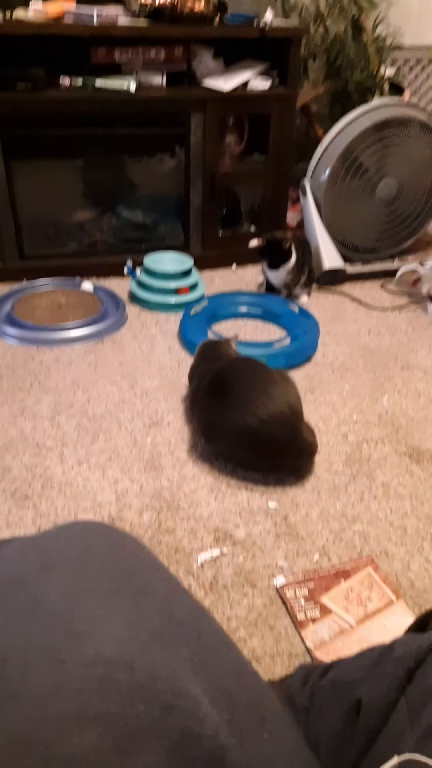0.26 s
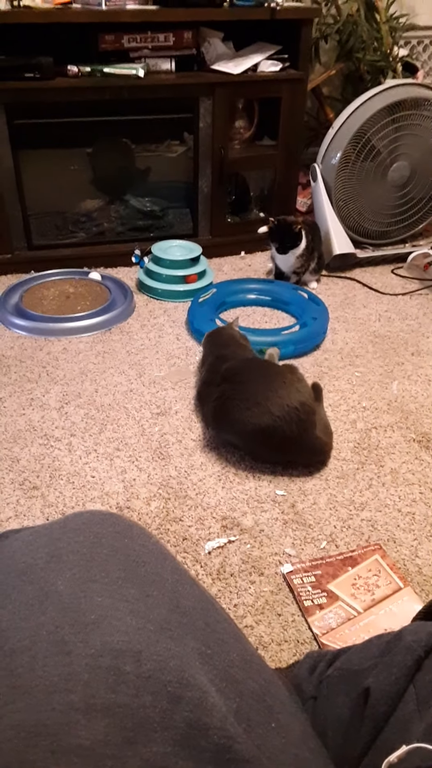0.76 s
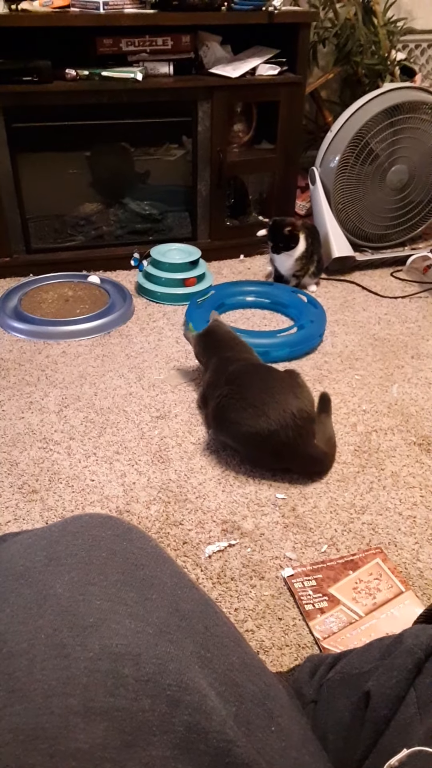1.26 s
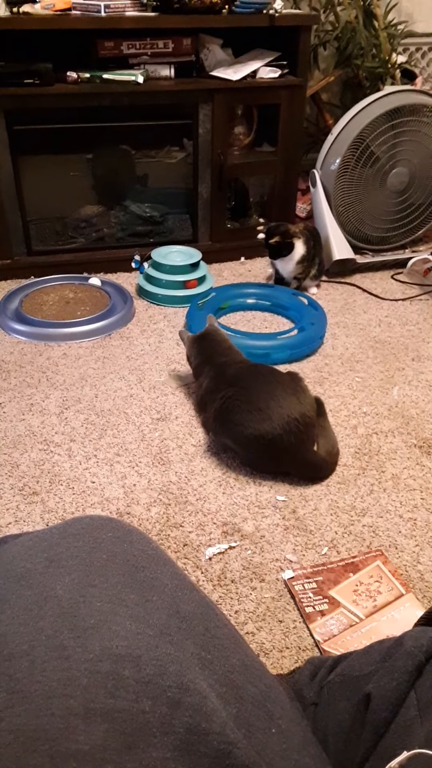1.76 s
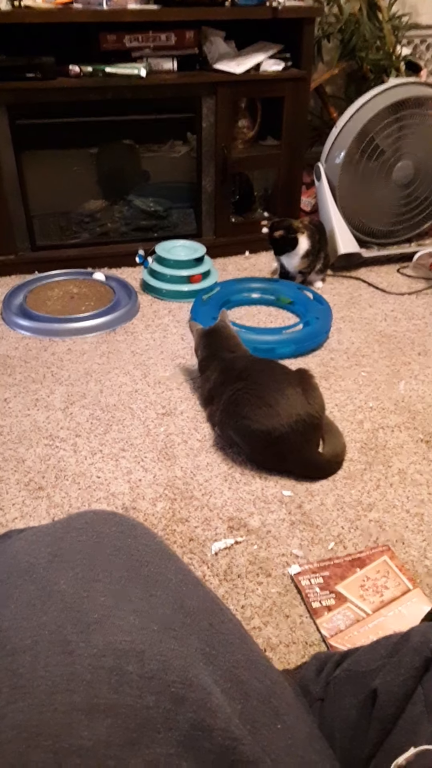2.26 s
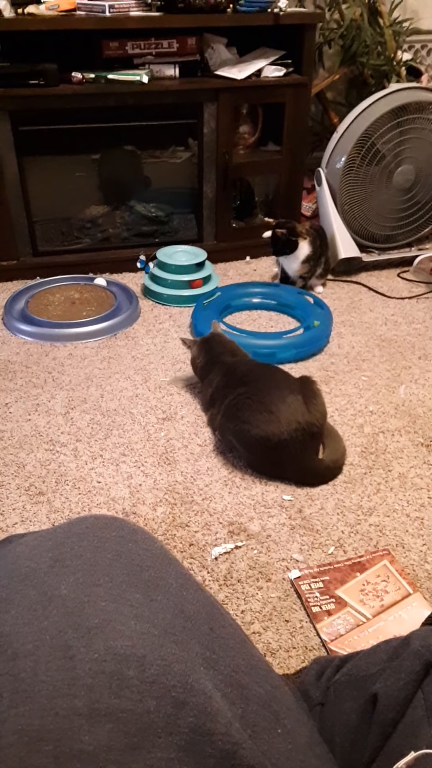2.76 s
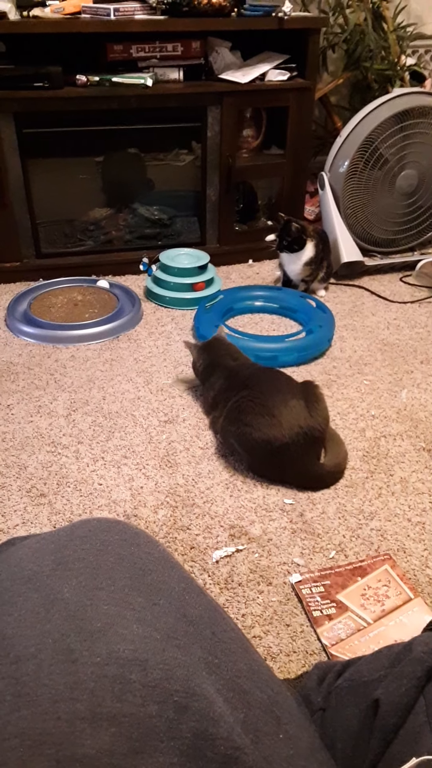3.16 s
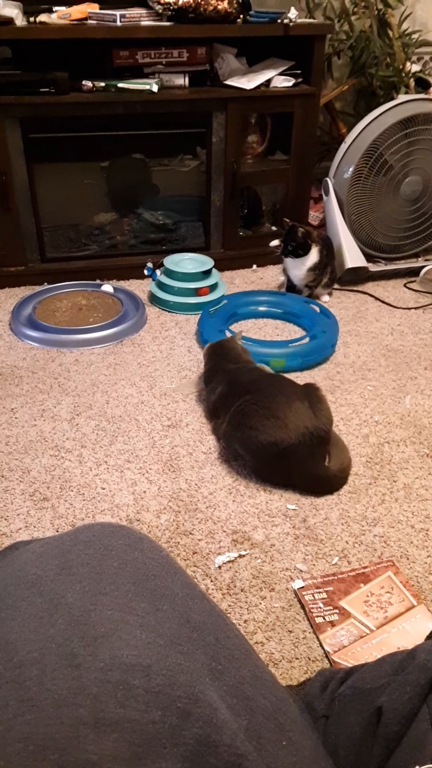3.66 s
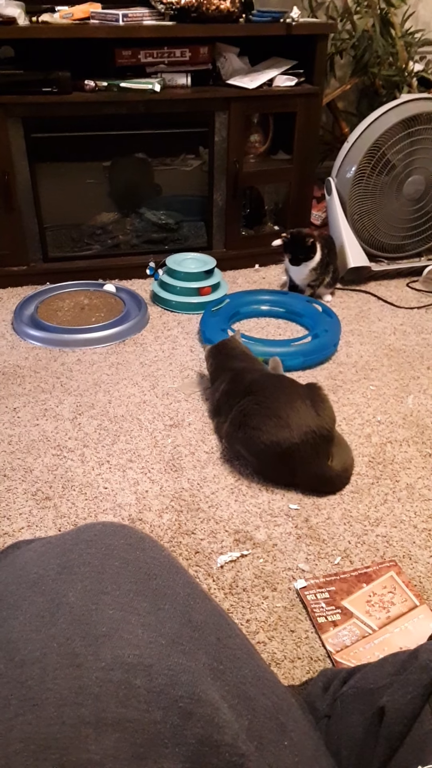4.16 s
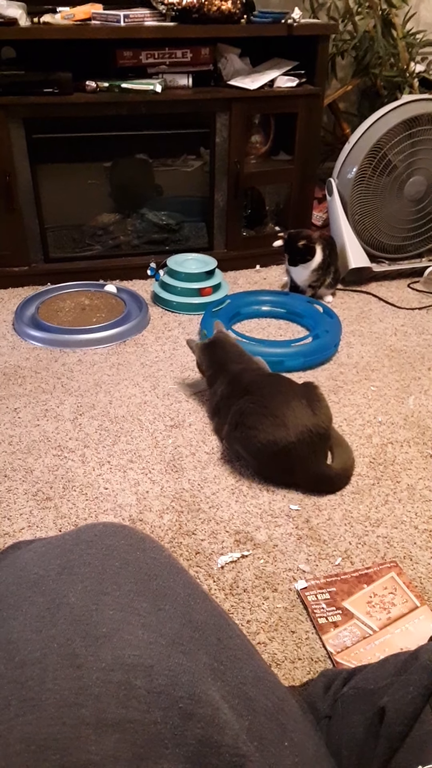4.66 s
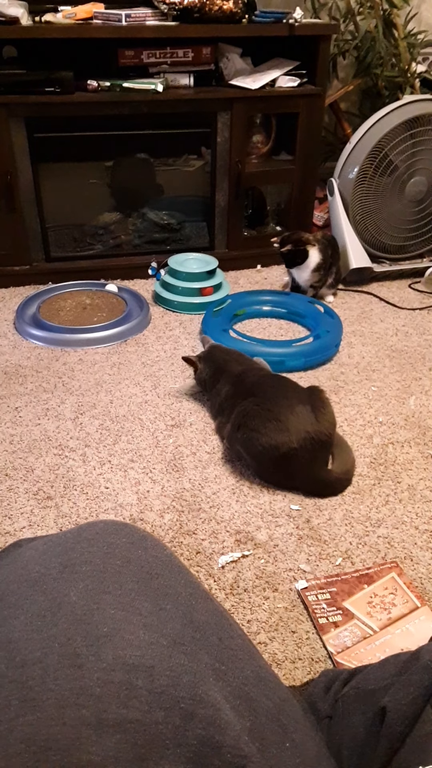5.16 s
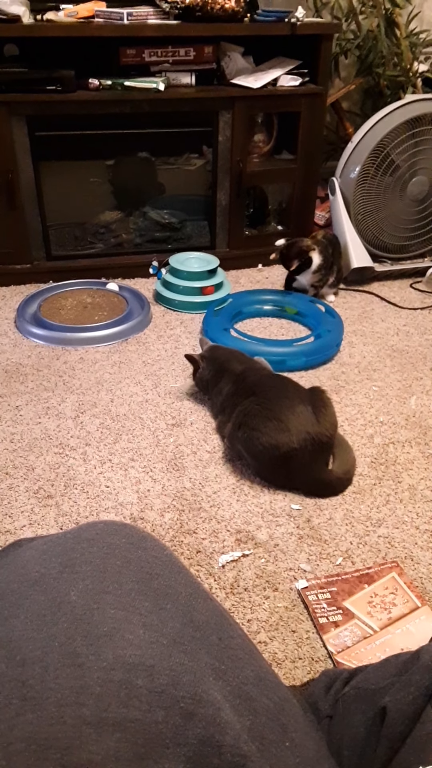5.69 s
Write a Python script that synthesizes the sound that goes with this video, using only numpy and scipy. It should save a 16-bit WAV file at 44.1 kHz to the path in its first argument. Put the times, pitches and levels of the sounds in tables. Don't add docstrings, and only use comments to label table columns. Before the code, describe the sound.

A plastic ball scrapes, knocks and rolls round a hollow toy track in bursts as a cat paws it, over a faint low fan hum.

```python
import sys
import numpy as np
from scipy import signal
from scipy.fft import rfft, irfft, next_fast_len
from scipy.io import wavfile
from scipy.ndimage import map_coordinates

SR = 44100
rng = np.random.default_rng(int(sys.argv[2]) if len(sys.argv) > 2 else 0)


def ratio(d):
    e = np.asarray(d, float) / 20
    return 10 ** e


def store_pcm(level_fs):
    pcm = np.round(np.clip(level_fs, -1, 1) * 32767).astype(np.int16)
    wavfile.write(sys.argv[1], SR, np.atleast_2d(pcm).T)


N = 261513
SIZE = 2 ** 14
BINS = np.fft.rfftfreq(SIZE, 1 / SR)


def unit(x):
    return x / np.sqrt(np.mean(np.abs(x) ** 2) + 1e-20)


def along(points, hz):
    f, v = np.transpose(points)
    return np.interp(np.log(hz + 1), np.log(f + 1), v)


def wobble(rate):
    knots = rng.standard_normal(int(N * rate / SR) + 4)
    return map_coordinates(knots, [np.arange(N) * rate / SR])


def filtered(x, response):
    m = next_fast_len(N + SR // 2)
    return irfft(rfft(x, m) * response(np.fft.rfftfreq(m, 1 / SR)), m)[..., :N]


# f/Hz, level/dB rms
MOTOR_LINES = [(59.2, -60), (118.4, -61), (258.4, -70)]
# f/Hz, level/dB per Hz
RUMBLE = [(25, -46), (48, -13), (140, -5), (330, -17), (472, -21), (620, -32.5), (1500, -30), (4000, -120)]
# f/Hz, correlation/1
ALIKE = [(60, 0.89), (130, 1), (290, 0.91), (640, 0.063), (1410, -0.74), (3100, 0.21), (6820, -0.018),
         (15000, 0.56)]


def fan():
    t = np.arange(N) / SR
    lines = 0
    for (hz, db), unsteady_db in zip(MOTOR_LINES, [0.3, 2.5, 1.5]):
        level = ratio(db + 3 + unsteady_db * wobble(7.1))
        lines = lines + level * np.sin(2 * np.pi * hz * t + 0.14 * unsteady_db * wobble(3.4))

    def mid_side(hz):
        turn = np.arccos(np.clip(along(ALIKE, hz), -1, 1)) / 2
        return ratio(along(RUMBLE, hz)) * [np.cos(turn), np.sin(turn)]

    mid, side = filtered(rng.standard_normal((2, N)), mid_side)
    rumble = unit(np.array([mid + side, mid - side]))
    return lines + ratio(-58 + 0.57 * wobble(5.24)) * rumble


def peak(f, hz, width):
    return 1j * f * width / (hz * hz - f * f + 1j * f * width)


def plastic(modes, count):
    spot_db, spot_pitch = 1.5, 0.015
    spot = rng.standard_normal((count, len(modes), 2))
    rows = 0
    for k, (hz, width, db) in enumerate(modes):
        level = ratio(db + spot_db * spot[:, k, :1])
        rows = rows + (-1) ** k * level * peak(BINS, hz * (1 + spot_pitch * spot[:, k, 1:]), width)
    last = BINS / modes[-1][0]
    rows = rows / (1 + 1j * last - last ** 2)
    return rows / np.sqrt(np.mean(np.abs(rows) ** 2, axis=1, keepdims=True))


# t/s, level/dB
ECHOES = [(.004, -2), (.0062, -8), (.0115, -8), (.0155, -9), (.021, -11), (.03, -12)]
# f/Hz, t60/s
DECAY = [(300, 0.22), (800, 0.24), (2000, 0.2), (5500, 0.21), (14000, 0.031)]


def room(spectra, starts):
    lead_s = 0.00015
    shadow_hz = 6000
    wet_db = -4.5
    count = len(starts)
    hz, t, z = signal.stft(rng.standard_normal((count, 2, SIZE)), SR, nperseg=256)
    likeness = along(ALIKE, hz).clip(0, 1)[:, None]
    z[:, 1] += likeness * (z[:, 0] - z[:, 1])
    z = z * ratio(-60 * t / along(DECAY, hz)[:, None])
    tail = signal.istft(z, SR, nperseg=256)[1][..., :SIZE]
    tail *= 1 - np.exp(-np.arange(SIZE) / SR / 0.01)
    tail /= np.linalg.norm(tail, axis=2, keepdims=True)

    late = rng.standard_normal((count, len(ECHOES), 2, 1)) * 0.00008
    late = late + rng.standard_normal((count, len(ECHOES), 1, 1)) * 0.000313
    near = 0
    for k, (s, db) in enumerate(ECHOES):
        near = near + ratio(db) * np.exp(-2j * np.pi * BINS * (s + late[:, k]))
    direct = np.exp(-2j * np.pi * BINS * np.array([[0], [lead_s]]))
    early = direct * (1 / (1 + 1j * BINS / shadow_hz) + near)
    heard = irfft(spectra[:, None] * (early + ratio(wet_db) * rfft(tail)), SIZE)
    out = np.zeros((2, N + SIZE))
    for s, piece in zip(starts, heard):
        out[:, s:s + SIZE] += piece
    return out[:, :N]


# t/s, length/s, level/dB, swell over the length/dB, hardness/dB
SHOVES = [(0.531, .1, -71, -0.5, 3), (0.65, 0.016, -76.5, 13, 6.5), (0.763, 0.022, -66.5, 5, -3),
          (0.866, 0.11, -60, 7, -0.5), (0.979, 0.066, -49.5, -10.5, 0.5), (1.136, 0.15, -51, -15.5, 8),
          (1.224, 0.28, -49, -7, -8.5), (3.923, 0.056, -69, 10.5, -0.5), (4.048, .1, -83, 0, 9.5),
          (4.192, 0.1, -78, 6, 12), (4.295, 0.032, -51.5, 0, 0.5), (4.34, 0.027, -53.5, -14, 11),
          (4.377, 0.13, -52, -2, -8)]
# t/s, length/s, level/dB, swell/dB, hardness/dB
PASSES = [(1.545, 0.086, -52.5, -8, -6), (1.763, 0.16, -54.5, -1.5, -8), (2.018, 0.23, -53.5, -11, -6),
          (2.277, 0.14, -58, 2.5, -9.5), (2.568, 0.14, -50.5, -6, -16), (2.857, 0.15, -53.5, -8, -16),
          (3.121, 0.095, -53, 1.5, -13), (3.443, 0.04, -61.5, 0, -9.5), (3.782, 0.047, -66, 1, -15),
          (4.589, 0.056, -62.5, 19, -11), (4.915, 0.047, -58, 7.5, -12), (5.18, 0.062, -63, 11, -10.5),
          (5.516, 0.074, -53.5, -3, -15), (5.816, 0.061, -56, -0.5, -18)]
# t/s, level/dB, loss/dB per s
PUSHES = [
    (1.119, -55, 8),
    (4.295, -61.5, 6.5),
]


def contact(offset_db, slope, steep):
    rise_db_per_s, fall_db_per_s, murmur_hardness_db = 3986, 166, -14.5
    t = np.arange(0, N / SR, 0.002)
    s, length, db, swell_db, hard_db = np.transpose(SHOVES + PASSES)[..., None]
    shape_db = swell_db * np.clip((t - s) / length, 0, 1)
    shape_db -= rise_db_per_s * np.maximum(s - t, 0)
    shape_db -= steep * fall_db_per_s * np.maximum(t - s - length, 0)
    rubs = ratio(db + slope * hard_db + shape_db)
    push_s, push_db, loss_db = np.transpose(PUSHES)[..., None]
    murmur = (t > push_s) * ratio(push_db + slope * murmur_hardness_db - loss_db * (t - push_s))
    power = np.sum(rubs ** 2, axis=0) + np.sum(murmur ** 2, axis=0)
    return ratio(offset_db) * np.interp(np.arange(N) / SR, t, np.sqrt(power))


# f/Hz, width/Hz, level/dB
THUD = [(200, 42, -6), (348, 115, -2.5), (391, 48.6, 7.5), (454, 172, -6.5)]
# f/Hz, width/Hz, level/dB
WALL = [(679.5, 125, -6.5), (899, 182, -2.5), (1330, 310, -5), (1612, 191, -3.5), (1790, 118, 1),
        (2000, 338, -2.5)]
# f/Hz, width/Hz, level/dB
SHELL = [(3110, 770, 1), (3814, 680, -2.5), (4290, 670, -1), (5440, 4680, -6), (6260, 830, -2.5),
         (6580, 600, -4.5), (7670, 2700, -10)]
# f/Hz, width/Hz, level/dB
EDGE = [(9400, 13000, 6), (12000, 6000, 8), (14900, 1800, -6)]
# offset/dB, slope/dB per dB of hardness, steepness of the fall/1
FOLLOW = [(5.5, 0.98, 1.1), (1.5, 1.12, 1.2), (-2, 1.5, 0.85), (-16, 1.7, 1.8)]


def trundle():
    high, shell, crisp, edge = [contact(*part) for part in FOLLOW]
    step = SR // 10
    count = N // step + 1
    grit_db, ticks_per_s = 2.5, 1200
    size = ratio(grit_db * rng.exponential(size=N) + 0.75 * wobble(30)) * rng.choice([-1, 1], N)
    ticks = unit((rng.random(N) < ticks_per_s / SR) * size)

    def cut(gain):
        return rfft(np.resize(ticks * gain, (count, step)), SIZE)

    low = cut(ratio(-9.5) * contact(0, 0, 0.96))
    spectra = low * (plastic(WALL[:4], count) + ratio(-3) * plastic(THUD, count))
    spectra += cut(ratio(-8) * high) * plastic(WALL[4:], count)
    spectra += cut(ratio(-10) * shell) * plastic(SHELL[:2], count)
    spectra += cut(ratio(-9) * crisp) * plastic(SHELL[2:], count)
    spectra += cut(ratio(-3) * edge) * plastic(EDGE, count)
    return room(spectra, np.arange(count) * step)


# t/s, peak level/dB, thud/dB, shell click/dB, loudest wall note f/Hz
PAW_BLOWS = [(0.539, -48, -28, -15.5, 1520), (0.661, -42.5, -37, -26, 2000),
             (0.676, -38.5, -38, -8.5, 1710), (0.759, -29, -9.5, -11, 1700), (0.889, -43.5, 2.5, -16, 2100),
             (0.902, -35, -7, -16, 2130), (0.968, -37, -36, -12.5, 1740), (1.117, -11.5, -22.5, -16.5, 920),
             (1.121, -19, -23, -7.5, 1820), (1.205, -29.5, -15.5, -12.5, 1790),
             (3.924, -47.5, -20, -21.5, 2000), (3.964, -37.5, -9, -19, 1590), (3.994, -36.5, -34, -14, 910),
             (4.116, -46, -45, -20, 1890), (4.201, -62, -33, -4, 1760), (4.295, -25, -18.5, -11, 1740),
             (4.357, -28, -14.5, -10, 636), (4.428, -32, -16.5, -19, 1100), (4.492, -39, -17, -15, 1840)]
# t/s, peak level/dB, thud/dB, loudest wall note
# f/Hz
FREE_TAPS = [(1.346, -38, -5, 1710), (1.406, -36.5, -10, 1310), (1.528, -43, -28, 2000),
             (1.545, -34, -7.5, 1390), (1.636, -39, -8, 1410), (1.687, -46, -10, 1950),
             (1.748, -44.5, -11, 1820), (1.783, -34.5, -13, 1830), (1.818, -36.5, -12, 1970),
             (1.881, -36, -8, 1340), (2.033, -33.5, -11.5, 910), (2.069, -33.5, -9, 1460),
             (2.167, -36.5, -16.5, 990), (2.251, -48, -19, 1330), (2.296, -36, -30, 920),
             (2.348, -37.5, -30, 2070), (2.419, -40, -9, 830), (2.569, -43.5, -17, 750),
             (2.691, -42.5, -9, 1450), (2.84, -40.5, -12, 1460), (2.959, -46.5, -23.5, 1840),
             (3.131, -44, -31, 830), (3.159, -42.5, -25, 870), (3.443, -62, -12, 930),
             (3.459, -47, 2, 800), (3.585, -52, -3.5, 1000), (3.787, -56.5, -8.5, 1007),
             (4.592, -46, -26, 1610), (4.625, -59, -5, 988), (4.646, -42.5, -28, 780),
               (4.698, -31, -20, 880), (4.9, -54.5, 3, 1240), (4.914, -42, -15, 1430),
               (4.938, -36.5, -12, 1420), (5.196, -44, -25, 2060), (5.214, -39.5, -3.5, 1780),
               (5.242, -40.5, -30, 899), (5.267, -33, -14, 910), (5.494, -47, 2.5, 980),
               (5.505, -42, -14, 905), (5.547, -37.5, -6.5, 910), (5.573, -53.5, -1, 899),
               (5.817, -44.5, -18, 813), (5.866, -42, -27, 802), (5.898, -44, -13.5, 810)]
# t/s, peak level/dB
CLAWS = [
    (1.117, -33),
    (1.205, -40),
    (2.034, -57),
    (2.113, -66),
    (4.15, -70),
    (4.19, -63),
    (4.359, -45),
]


def knocks():
    tap_shell_db, middle_tap_db = -24, -48
    taps = []
    for s, db, thud_db, hz in FREE_TAPS:
        click_db = tap_shell_db + 0.53 * (db - middle_tap_db)
        taps.append((s, db, thud_db, click_db, hz))
    s, db, thud_db, shell_db, note_hz = np.transpose(PAW_BLOWS + taps)[..., None]
    claw_s, claw_db = np.transpose(CLAWS)[..., None]
    count, every = len(s), len(s) + len(claw_s)

    t = np.arange(400) / SR
    rebounds = rng.random((every, 400)) < 0.06
    chatter = 0.3 * rng.standard_normal((every, 400)) * ratio(-60 * t / 0.008) * rebounds
    chatter[:, 0] = 1

    body = (1 + 1.4 * peak(BINS, note_hz, 170)) * plastic(WALL, count)
    body += ratio(-8) * peak(BINS, 1130, 1130)
    body += ratio(thud_db + 7.5) * plastic(THUD, count)
    crisp_db = 0.59 * (shell_db - tap_shell_db) - 6.5
    click = plastic(SHELL[:2], count) + ratio(crisp_db) * plastic(SHELL[2:], count)
    body += ratio(shell_db + 7.5) * click
    claws = ratio(claw_db + 12.5) * plastic(EDGE, len(claw_s))
    body = np.concatenate([ratio(db + 8) * body, claws])
    starts = np.round(np.concatenate([s, claw_s])[:, 0] * SR).astype(int)
    return room(rfft(chatter, SIZE) * body, starts)


def scene():
    return fan() + trundle() + knocks()


def top_cut(x):
    return signal.sosfilt(signal.butter(12, 16090, fs=SR, output="sos"), x)


# f/Hz, left over right level/dB
PORTS = [(60, 1), (150, 1), (450, -4.5), (800, -1), (1500, -0.5), (3400, 4), (8200, 6), (15000, 17)]
# f/Hz, level/dB per Hz
HISS = [(1180, -4), (2000, -1.5), (4410, -9.5), (4680, -6), (6000, -11.5), (14600, -7.5), (15900, -7.5)]


def record(dry):
    ports = filtered(dry, lambda hz: ratio(along(PORTS, hz) * np.array([[0.5], [-0.5]])))
    hiss = unit(filtered(rng.standard_normal((2, N)), lambda hz: ratio(along(HISS, hz))))
    mix = filtered(ports + ratio(-72.5) * hiss, lambda hz: hz < 15730)
    return top_cut(mix)


dry = scene()
out = record(dry)
store_pcm(out)
```